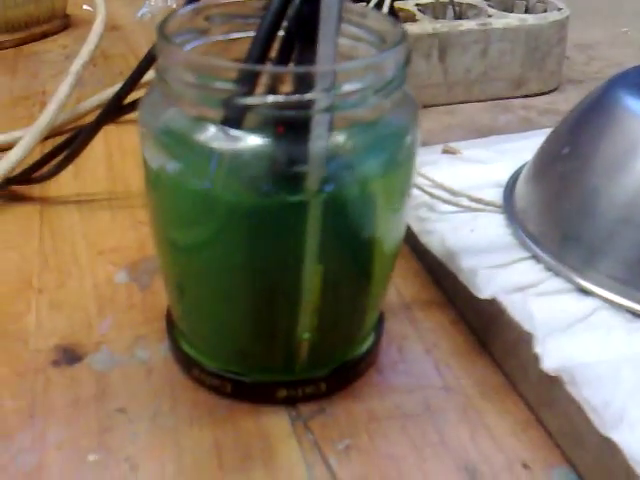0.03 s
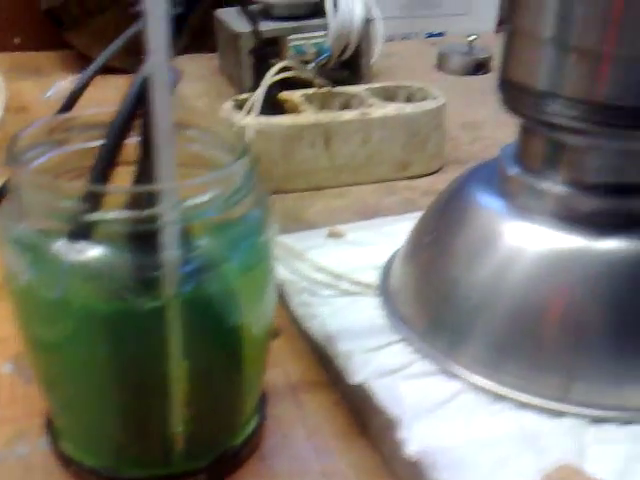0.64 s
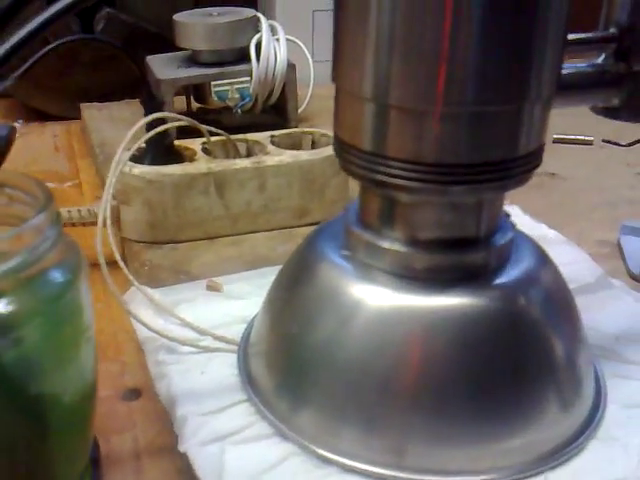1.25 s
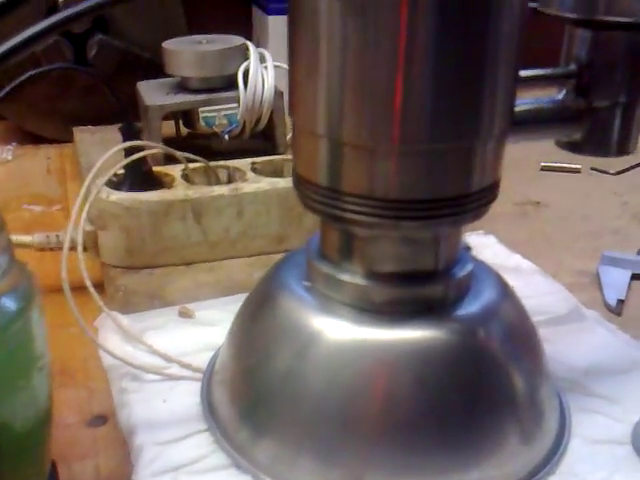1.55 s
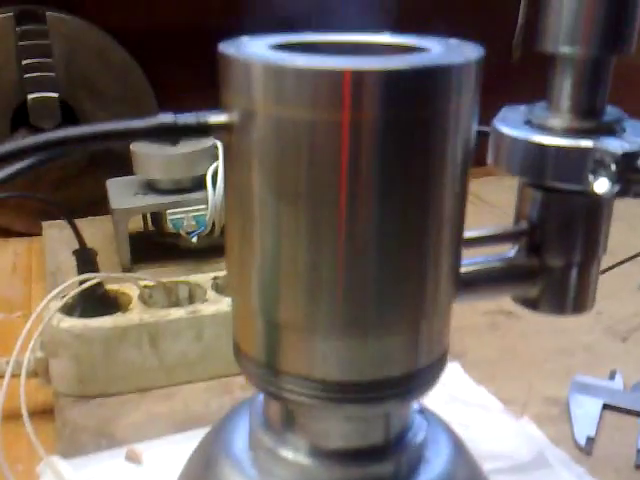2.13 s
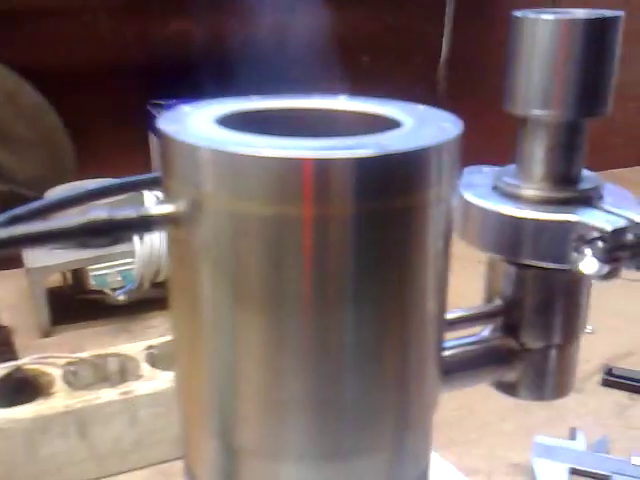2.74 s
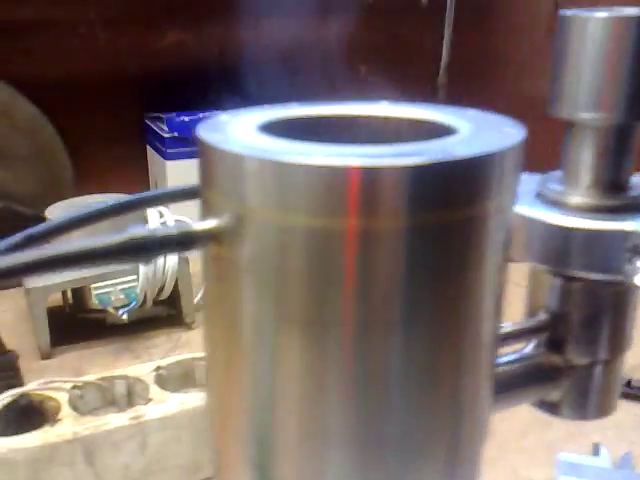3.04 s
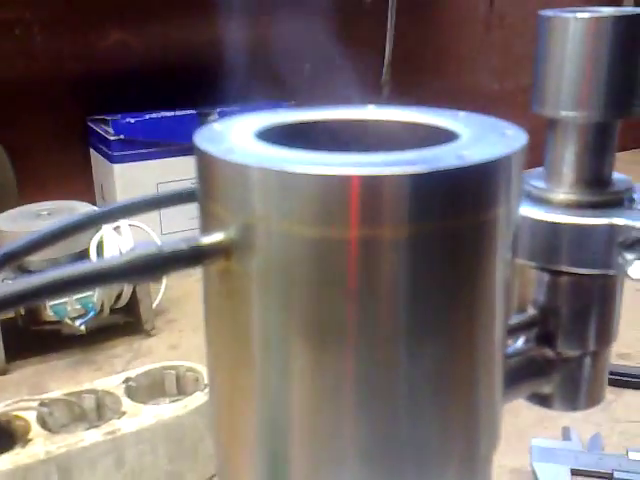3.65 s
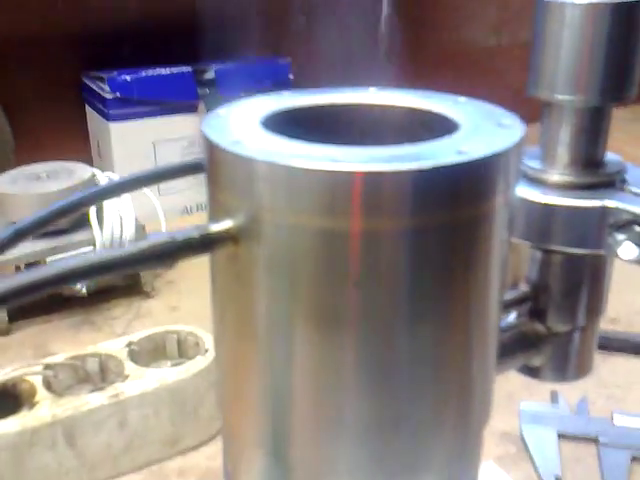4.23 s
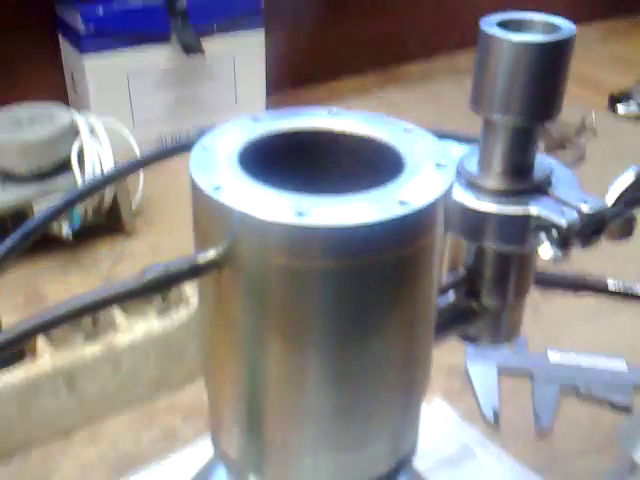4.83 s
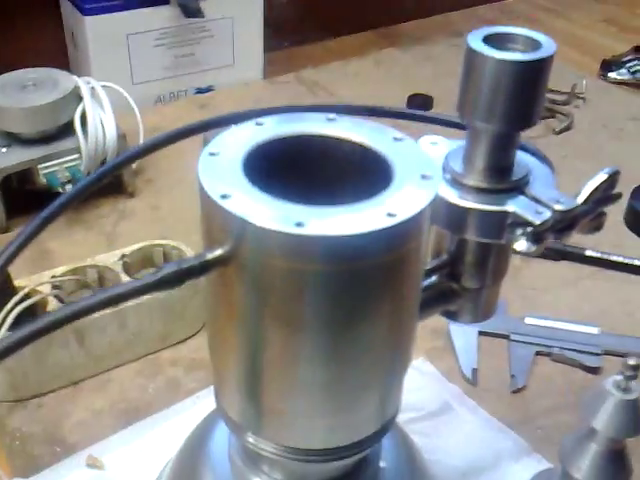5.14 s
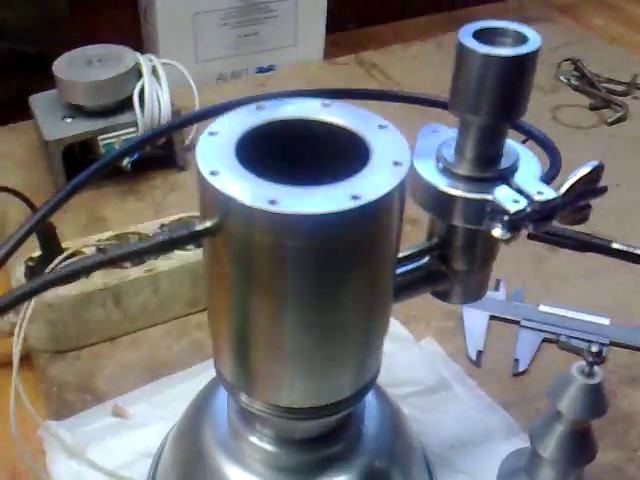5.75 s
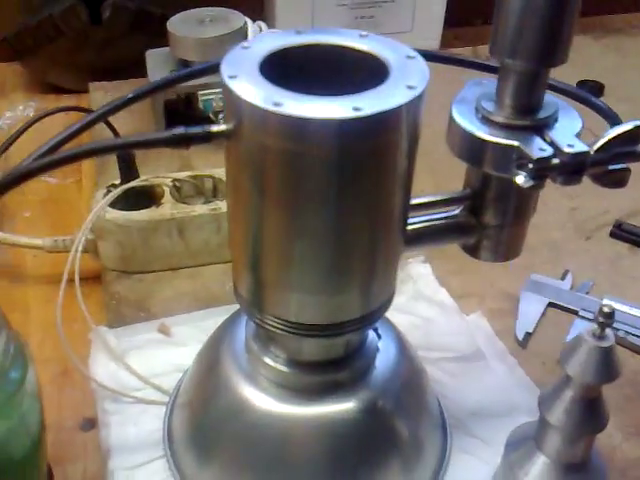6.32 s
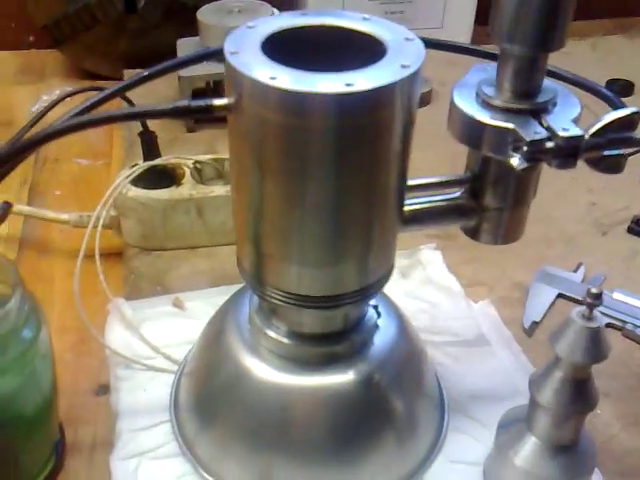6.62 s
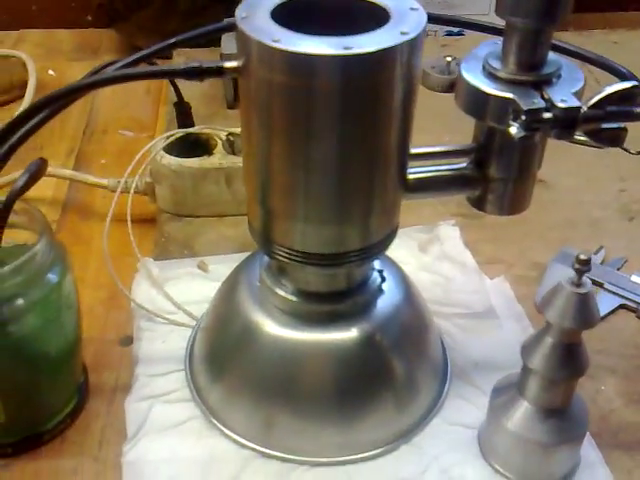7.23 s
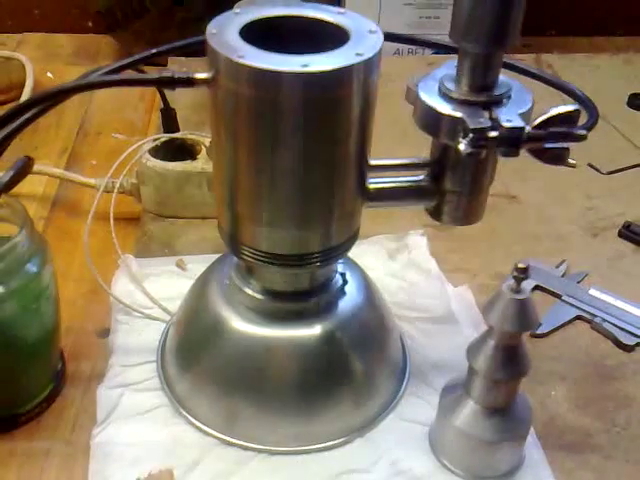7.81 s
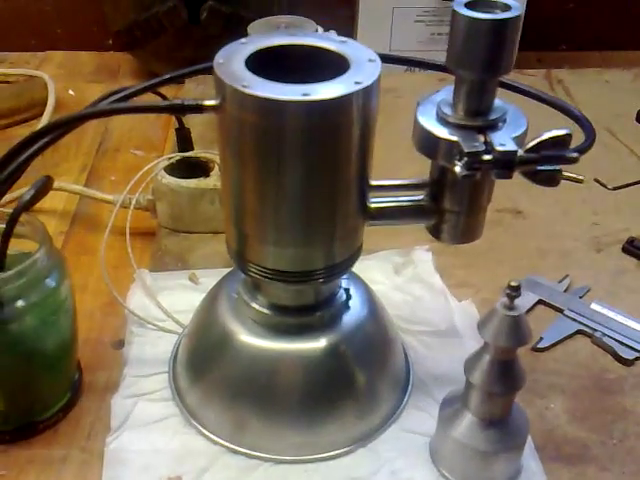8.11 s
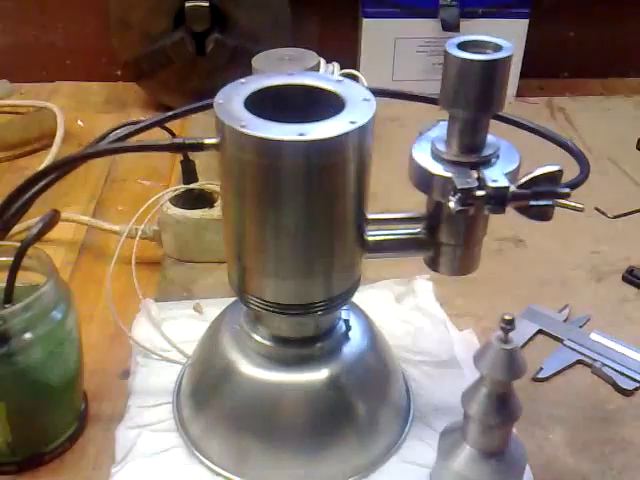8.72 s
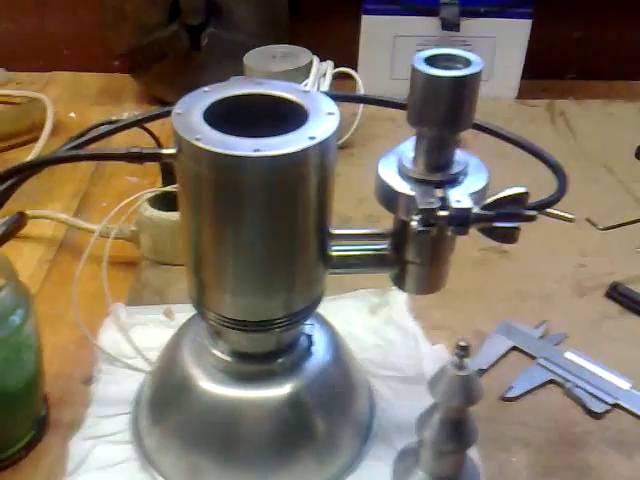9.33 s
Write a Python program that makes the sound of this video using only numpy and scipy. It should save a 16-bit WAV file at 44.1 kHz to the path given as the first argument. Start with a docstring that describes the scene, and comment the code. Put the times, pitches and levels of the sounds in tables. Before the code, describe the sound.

A small pump buzzes and ticks while air gurgles rapidly through liquid, with scattered clicks and soft microphone bumps.

```python
"""A small pump on a workbench

A mains-driven vibrating pump pushes liquid through hoses and a steel vessel. Each stroke
rattles its casing and ticks in its valve. Pockets of air ring in quick, uneven gulps over
a fine churning. Now and then something clicks, and the hand-held microphone is bumped softly."""
import sys
import numpy as np
from scipy import signal
from scipy.fft import rfft, irfft
from scipy.io import wavfile

SR = 44100
rng = np.random.default_rng(int(sys.argv[2]) if len(sys.argv) > 2 else 0)


def transcribe(u):
    """Save the signal u as a 16-bit wav file named by the first command-line argument.

    u: samples, shape (n,) or (channels, n), limited to [-1, 1]; the rate is SR.
    q: integer samples, one column per channel.
    """
    v = np.clip(np.atleast_2d(u).T, -1, 1)
    q = np.round(v * 32767).astype(np.int16)
    wavfile.write(sys.argv[1], SR, q)


N = 413216
TIME = np.arange(N) / SR
STROKE_HZ, FIRST_STROKE_S = 49.976, 0.0075


def from_db(db):
    """Turn decibels into a gain to multiply by."""
    return 10 ** (np.asarray(db) / 20)


def rms_one(x):
    """Scale a sound so that its average strength (rms) is one."""
    return x / np.sqrt(np.mean(x ** 2) + 1e-20)


def add(out, s, sound):
    """Mix in a short sound, starting at s seconds."""
    i = int(np.clip(round(s * SR), 0, N - 1))
    out[i:i + len(sound)] += sound[:N - i]


def impulses(times, sizes):
    """Put one spike at each time."""
    return np.bincount(np.clip(np.round(times * SR).astype(int), 0, N - 1), sizes, N) + 1e-18


def in_time(rows):
    """Join rows that begin with a time into one curve for each other column."""
    times, *columns = np.transpose(rows)
    return [np.interp(TIME, times, column) for column in columns]


def resonate(x, hz, width_hz):
    """Ring at a pitch that may move: shift it down to zero, smooth, shift back."""
    decay = np.exp(-np.pi * width_hz / SR)
    turn = np.exp(2j * np.pi * np.cumsum(np.broadcast_to(hz, N)) / SR)
    return 2 * np.real(turn * signal.lfilter([1 - decay], [1, -decay], x * turn.conj()))


def band(x, low_hz, high_hz, order=2):
    """Keep what lies between two frequencies."""
    return signal.sosfilt(signal.butter(order, [low_hz, high_hz], "band", fs=SR, output="sos"), x)


def fade(x, decay_s):
    """Give every spike a tail that dies away."""
    return signal.lfilter([1], [1, -np.exp(-1 / (decay_s * SR))], x)


def colour(x, points, size=4096):
    """Shape the tone along (Hz, dB) points, with no ringing ahead of a sound."""
    hz, db = np.transpose(points)
    grid = np.maximum(np.arange(size // 2 + 1) * SR / size, 1)
    cepstrum = irfft(np.log(from_db(np.interp(np.log(grid), np.log(hz), db))))
    cepstrum[1:size // 2] *= 2
    cepstrum[size // 2 + 1:] = 0
    return signal.oaconvolve(x, irfft(np.exp(rfft(cepstrum))))[:N]


def background(nearness):
    """Mains hum, a steady hiss and the rumble of the bench, which shakes with the liquid."""
    # Each row: multiple of the stroke rate, level in dB at average closeness.
    hum_tones = [(2, -67), (3, -66.5), (25, -47.5), (26, -59), (29, -66.5)]
    # The tone of the hiss. Each row: frequency in Hz, relative level in dB.
    hiss_tone = [(20, -9.5), (40, -1.5), (90, -4.5), (200, -6.5), (500, 5), (1500, -23), (4000, -18.5),
                 (7000, -21), (12000, -25.5), (17000, -25)]
    hum = sum(from_db(db) * np.sqrt(2) * np.sin(2 * np.pi * k * STROKE_HZ * TIME) for k, db in hum_tones)
    hiss = from_db(-52) * rms_one(colour(rng.standard_normal(N), hiss_tone))
    rumble = from_db(-62) * rms_one(band(rng.standard_normal(N), 32, 207))
    return hiss + nearness * (hum + rumble)


def workshop(x, echo_s, echo_db):
    """Add weak, blurred echoes from the bench and walls; they fall 60 dB in echo_s."""
    t = TIME[:SR // 2]
    tail = band(rng.standard_normal(len(t)), 150, 9600, order=1)
    tail *= from_db(-60 * t / echo_s) * (t > 0.004)
    return x + from_db(echo_db) * signal.oaconvolve(x, tail / np.linalg.norm(tail))[:N]


def microphone_bumps(rustle_db):
    """Bumps on the microphone give dull, rustling thuds; the hand rubs it softly."""
    # Each row: start in seconds, level in dB, pitch in Hz, rise time in seconds.
    thuds = [(2.61, -38, 75, 0.0079), (4.329, -42, 85, 0.011), (4.386, -42, 111, 0.0094),
             (4.467, -29, 168, 0.0035), (5.246, -43, 80, 0.0074), (5.954, -28, 115, 0.0022),
             (8.869, -36.5, 89.5, 0.0054), (9.083, -23, 424, 0.00087)]
    # Each row: middle in seconds, level in dB, half length in seconds.
    scuffs = [(3.076, -53, 0.03), (4.47, -46.5, 0.014), (5.615, -56, .012), (5.952, -55, .02),
              (9.083, -56, 0.0065)]
    t, out = TIME[:SR // 6], np.zeros(N)
    for s, db, hz, rise_s in thuds:
        rustle = from_db(rustle_db) * rms_one(band(rng.standard_normal(len(t)), 40, 480))
        shape = t / rise_s * np.exp(1 - t / rise_s)
        add(out, s, from_db(db) * shape * (np.sin(2 * np.pi * hz * t) + rustle))
    rubbing = sum(from_db(db) * np.exp(-((TIME - s) / half_s) ** 2 / 2) for s, db, half_s in scuffs)
    return out + rubbing * rms_one(band(rng.standard_normal(N), 2000, 12000, order=1))


def clicks(ring_s, crack_s):
    """Each click is a very short ring with a dry crack on top."""
    # Each row: start in seconds, level in dB, pitch in Hz, brightness in dB.
    sharp_clicks = [(.583, -19, 2000, -25), (1.483, -19, 1900, 6.5), (2.926, -13.5, 2480, -20),
                    (3.011, -20, 1250, -22), (5.477, -23, 2064, -23), (5.652, -26, 2160, -20),
                    (5.854, -16, 2240, -29), (6.246, -25, 2000, -22), (6.435, -18, 2200, -29),
                    (6.87, -31, 2070, -20), (7.277, -22.5, 2100, -22), (7.584, -25.5, 2070, -22),
                    (8.934, -24.5, 2250, -22)]
    t, out = TIME[:SR // 40], np.zeros(N)
    for s, db, hz, bright_db in sharp_clicks:
        ring = t / ring_s * np.exp(1 - t / ring_s) * np.sin(2 * np.pi * hz * t)
        noise = rng.standard_normal(len(t)) * np.exp(-t / crack_s)
        crack = band(noise, 710, 2100) + from_db(bright_db) * band(noise, 3100, 4650)
        add(out, s, from_db(db) * (ring + crack))
    return out


def churning(per_s, spread_db):
    """Many tiny collapses of uneven size in the liquid, heard through the vessel."""
    # Each row: frequency in Hz, relative level in dB.
    vessel_tone = [(120, -20.5), (230, -6.5), (310, 5.5), (470, -1), (630, 13), (830, 7), (940, -3.5),
                   (1000, 3.5), (1330, 0), (1420, 0), (1700, -1), (1950, -15), (2800, -6), (3400, -17),
                   (6500, -32), (14000, -39.5)]
    sizes = from_db(spread_db * np.minimum(rng.exponential(1, N), 3)) * rng.choice([-1, 1], N)
    happens = rng.random(N) < per_s / SR
    return rms_one(colour(sizes * happens, vessel_tone))


def gulp_rhythm(per_s, full_db, shortfall_db, jitter_s, pitch_spread):
    """Weaker gulps keep an uneven beat between the strong ones. Gives rows of seconds, dB and Hz."""
    # Each row: time in seconds, peak level in dB.
    strong_gulps = [(0.014, -20), (0.21, -18), (0.359, -19), (0.504, -19), (0.699, -20.5), (0.784, -20.5),
                    (0.931, -20.5), (1.38, -17.5), (1.468, -20.5), (1.697, -17.5), (1.87, -18.5),
                    (2.149, -20.5), (2.405, -19.5), (2.717, -16.5), (2.902, -21), (3.072, -18),
                    (3.209, -20.5), (3.314, -17.5), (3.453, -16.5), (3.709, -19.5), (3.899, -17.5),
                    (4.037, -16.5), (4.103, -20), (4.283, -17.5), (4.442, -14.5), (4.601, -23.5),
                    (4.804, -18.5), (5.222, -17.5), (5.426, -22), (5.887, -21), (6.189, -22),
                    (6.384, -24.5), (6.904, -24.5), (7.171, -24), (7.363, -19.5), (7.922, -22),
                    (8.216, -25.5), (8.549, -24), (8.853, -23.5)]
    # The liquid as the microphone moves in over the vessel and away.
    # Each row: time in seconds, base level of the weaker gulps in dB, gulp pitch in Hz.
    liquid_curve = [(0, -32.5, 680), (1, -33.5, 648), (1.5, -31.5, 643), (2.6, -32, 616), (4.1, -28, 625),
                    (5, -34, 648), (5.8, -34, 672), (8.199, -38.5, 660), (9.3, -35, 672)]
    strong_s, strong_db = np.transpose(strong_gulps)
    curve_s, base_db, pitch_hz = np.transpose(liquid_curve)
    edges = [0, *np.sort(strong_s), N / SR]
    beats = np.concatenate([np.linspace(start, end, max(round((end - start) * per_s), 1) + 1)[1:-1]
                            for start, end in zip(edges, edges[1:])])
    late, higher = np.clip(rng.standard_normal((len(beats), 2)), -2, 2).T
    missed = rng.random(len(beats)) < 0.15   # these beats draw hardly any air
    drop_db = shortfall_db * rng.exponential(1, len(beats)) + 9.5 * missed
    beat_db = np.interp(beats, curve_s, base_db) + full_db - drop_db
    times = np.concatenate([strong_s, beats + jitter_s * late])
    detune = np.concatenate([np.zeros(len(strong_s)), pitch_spread * higher])
    pitches = np.interp(times, curve_s, pitch_hz) * np.exp(detune)
    return np.transpose([times, np.concatenate([strong_db, beat_db]), pitches])


def gulps(rhythm, swell_s, ring_s, ring_spread, lead_s):
    """An air pocket swells and rings out with a splash; the hollow vessel rings on after it."""
    # Each row: frequency in Hz, relative level in dB.
    splash_tone = [(100, -10), (220, -3), (310, -4.5), (480, -14), (620, -7.5), (820, 12), (940, -30),
                   (1020, 5.5), (1300, -9), (1900, -27), (2800, -1), (3500, -20), (8000, -38), (14000, -62)]
    t, pockets = TIME[:SR // 30], np.zeros(N)
    for (s, db, hz), longer in zip(rhythm, rng.uniform(-0.15, 1, len(rhythm))):
        decay_s = ring_s * np.exp(ring_spread * longer)
        shape = (1 - np.exp(-(t / swell_s) ** 2)) * np.exp(-(t / decay_s) ** 1.32)
        add(pockets, s - lead_s, from_db(db) * shape / shape.max() * np.sin(2 * np.pi * hz * t))
    bursts = fade(impulses(rhythm[:, 0], from_db(rhythm[:, 1])), 0.0035) * rng.standard_normal(N)
    splash = from_db(-14.5) * np.std(pockets) * rms_one(colour(bursts, splash_tone))
    vessel = from_db(-11.5) * resonate(pockets, hz=629.6, width_hz=36)
    return pockets + vessel + splash


def rattle(notes, force_db, chatter_s, uneven_db, rub, jitter_s=0.0001):
    """Each stroke and return sets notes ringing with a knock and a chatter, over light rubbing."""
    # Each row of notes: pitch in Hz, width in Hz, relative level in dB, delay in seconds,
    # change on the return stroke in dB, looseness from 0 (all knock) to 1 (all chatter).
    strokes = np.arange(len(force_db))
    times, out = FIRST_STROKE_S + strokes / (2 * STROKE_HZ), 0
    for hz, width_hz, db, delay_s, return_db, loose in notes:
        late, stronger = rng.standard_normal((2, len(times)))
        knock_db = force_db + strokes % 2 * return_db + uneven_db * stronger
        knocks = impulses(times + delay_s + jitter_s * late, from_db(knock_db))
        tails = rms_one(fade(fade(knocks, chatter_s), 0.00027))
        chatter = (tails + rub) * rng.standard_normal(N)
        drive = np.sqrt(1 - loose) * rms_one(knocks) + np.sqrt(loose) * rms_one(chatter)
        out = out + from_db(db) * rms_one(resonate(drive, hz, width_hz))
    return out


def drifting_ring_and_whistle():
    """A high ring and a thin whistle in the pump's ticking swell, fade and drift in pitch."""
    # Each row: middle and half length in seconds, ring in Hz and dB, whistle in Hz and dB.
    spells = [(1.15, 0.38, 5270, -46.5, 10240, -58.5), (2.37, 0.77, 5110, -48.5, 9500, -59),
              (5.35, 0.36, 5110, -70, 9100, -68), (7.3, 0.65, 5075, -60, 9400, -84)]
    middle_s, half_s, ring_hz, ring_db, whistle_hz, whistle_db = np.transpose(spells)
    swell = np.exp(-np.square((TIME - middle_s[:, None]) / half_s[:, None]))
    share = (swell + 1e-9) / (swell + 1e-9).sum(axis=0)
    return ring_hz @ share, from_db(ring_db) @ swell, whistle_hz @ share, from_db(whistle_db) @ swell


def valve_squeaks(rest_hz, force_db, lead_s, uneven_db, pitch_spread, jitter_s):
    """At each stroke the valve gives a tiny chirp that falls onto its resting pitch."""
    start_ratio, glide_s, peak_s = 1.174, 0.00073, 0.0012
    t, out = TIME[:SR // 50], np.zeros(N)
    shape = (t / peak_s * np.exp(1 - t / peak_s)) ** 0.53
    glide = np.cumsum(1 + (start_ratio - 1) * np.exp(-t / glide_s)) / SR
    for k, (late, louder, higher, phase) in enumerate(rng.standard_normal((len(force_db) // 2, 4))):
        s = FIRST_STROKE_S + k / STROKE_HZ
        hz = rest_hz[int(s * SR)] * np.exp(pitch_spread * higher)
        chirp = shape * np.sin(2 * np.pi * (hz * glide + phase))
        add(out, s - lead_s + jitter_s * late, from_db(force_db[2 * k] + uneven_db * louder) * chirp)
    return rms_one(band(out, 3000, 8000))


def pump_valve(force_db, valve_db, spit_db):
    """The valve ticks, squeaks and spits each stroke; a ring, a whistle and a sizzle are heard too."""
    # The notes of the tick and of the spit, with the columns listed in rattle().
    tick_notes = [(3566, 67, -8, 0, 0, 1), (4080, 270, -3.5, 0, -10.5, 0.51),
                  (4485, 23, -7, 0.0019, -33, 0.88), (5160, 980, 0, 0.0029, 0, 0.54)]
    spit_notes = [(7500, 3100, 2.5, 0.00044, -9, 0.51), (9420, 460, -3.5, 0.0014, -12, 1),
                  (10100, 410, -15, 0.005, -12, 0.44)]
    ring_hz, ring_gain, whistle_hz, whistle_gain = drifting_ring_and_whistle()
    ring_note = (ring_hz, 130, 0, 0.0015, -12, 0.4)
    whistle_note = (whistle_hz, 380, 0, 0, -10, 0.9)
    ticks = rattle(tick_notes, force_db, chatter_s=0.0014, uneven_db=1.5, rub=0.23)
    squeaks = valve_squeaks(1.02 * ring_hz, force_db, lead_s=0.0004, uneven_db=3.5,
                            pitch_spread=0.018, jitter_s=0.00018)
    out = from_db(valve_db - 6.5) * band(ticks, 3060, 6050, order=3) + from_db(valve_db - 5.5) * squeaks
    out += ring_gain * rattle([ring_note], force_db, chatter_s=0.00075, uneven_db=3.5, rub=0.1)
    spit_db = spit_db + 0.5 * (spit_db - spit_db.max())   # the thin spit fades fast with distance
    spit = rattle(spit_notes, force_db, chatter_s=0.0012, uneven_db=1.3, rub=0.26)
    whistle = rattle([whistle_note], force_db, chatter_s=0.0011, uneven_db=0.5, rub=0.32)
    out += band(from_db(spit_db - 3.5) * spit + whistle_gain * whistle, 7700, 11300, order=4)
    sizzle = rms_one(band(rng.standard_normal(N), 7500, 17000, order=1))
    return out + from_db(spit_db - 5) * sizzle


def pump_body(force_db, near_db, casing_db):
    """The armature (the moving iron) knocks at the end of its travel; body and casing ring and rattle."""
    # The notes of each part, with the columns listed in rattle().
    hollow_notes = [(1263, 100, 0.5, 0.00191, -8, 1)]
    armature_notes = [(1670, 380, 0, 0.002817, -10, 0)]
    metal_ring_notes = [(2169, 26, -6, 0.0023, -9, 1), (2208, 38, -2, 0.00075, -7, 1),
                        (2314, 233, -1.5, 0.001006, -14.5, 0.62)]
    casing_notes = [(2583, 93, -6, 0.0018, 2.5, 0.84), (2800, 1800, -9.5, 0.0015, 5, 1),
                    (3025, 113, -2, .0005, 3, 0.33)]
    # The casing's ring swells. Each row: middle in seconds, half length in seconds, rise in dB.
    ring_swells = [(0.309, 0.82, 6), (4.1, 0.32, 4.5), (6.55, 0.31, 4.5)]
    hollow = rattle(hollow_notes, force_db, chatter_s=0.0018, uneven_db=-0.4, rub=0.21, jitter_s=0.00008)
    knock = rattle(armature_notes, force_db, chatter_s=0.002, uneven_db=-3, rub=0.15, jitter_s=0.00012)
    ring = rattle(metal_ring_notes, force_db, chatter_s=0.0061, uneven_db=4.5, rub=0.87)
    clatter = rattle(casing_notes, force_db, chatter_s=0.00068, uneven_db=3.8, rub=0.062)
    swell_db = sum(db * np.exp(-np.square((TIME - s) / half_s)) for s, half_s, db in ring_swells)
    body = from_db(-45 + 2.14 * near_db) * hollow + from_db(-45.5 + 1.14 * near_db) * knock
    casing = from_db(-45 + 0.73 * near_db + swell_db) * ring + from_db(casing_db - 1.9) * clatter
    return band(body, 946, 1810) + band(casing, 1710, 3020, order=4)


def scene():
    """Pump, liquid and clicks sound in the room, with microphone bumps, hum and hiss."""
    # How close the microphone is to the vessel. Each row: time in seconds, relative level in dB.
    closeness = [(0.1, -42.5), (1.2, -41), (2.2, -39.5), (3.0, -36.5), (3.9, -37), (4.8, -37.5), (5.7, -39),
                 (6.5, -42), (8, -42), (9.2, -43.5)]
    # The pump's treble. Each row: time in seconds, then base levels of casing, valve and spit in dB.
    treble_levels = [(0.1, -43.6, -48.5, -60), (0.7, -41, -49.5, -60), (1.2, -39, -50.5, -57),
                     (1.7, -42, -52, -57.5), (2.4, -42.5, -48.5, -61), (3.0, -43, -47, -55),
                     (3.7, -39.5, -45, -56.5), (4.3, -44, -45.5, -56.5), (4.9, -49.5, -49.5, -58),
                     (5.5, -41.5, -51.5, -58.5), (6.1, -51.5, -53.5, -62.5), (6.9, -44.5, -54.5, -64),
                     (7.7, -44.5, -54, -68.5), (8.5, -43.5, -54.5, -67), (9.2, -47, -54.5, -65)]
    close_db, = in_time(closeness)
    casing_db, valve_db, spit_db = in_time(treble_levels)
    near_db = 0.79 * (close_db - close_db.mean())
    # One random strength for each stroke and each return.
    force_db = 1.73 * np.clip(rng.standard_normal(int(2 * STROKE_HZ * N / SR)), -2, 2)
    pump = pump_body(force_db, near_db, casing_db) + pump_valve(force_db, valve_db, spit_db)
    rhythm = gulp_rhythm(per_s=35.2, full_db=11.5, shortfall_db=3.5, jitter_s=0.002095,
                         pitch_spread=0.022)
    liquid = from_db(0.2) * gulps(rhythm, swell_s=0.0013, ring_s=0.0051, ring_spread=0.18, lead_s=0.00067)
    liquid += from_db(-37 + near_db) * churning(per_s=800, spread_db=5.5)
    bench = pump + liquid + clicks(ring_s=0.00051, crack_s=0.002)
    room = background(from_db(near_db)) + workshop(bench, echo_s=0.19, echo_db=-16.5)
    return (room + microphone_bumps(rustle_db=-4))[None]


def record(dry):
    """Cut the treble steeply above 17200 Hz."""
    return signal.sosfilt(signal.ellip(12, 0.1, 80, 17200, fs=SR, output="sos"), dry)


dry = scene()
out = record(dry)
transcribe(out)
```